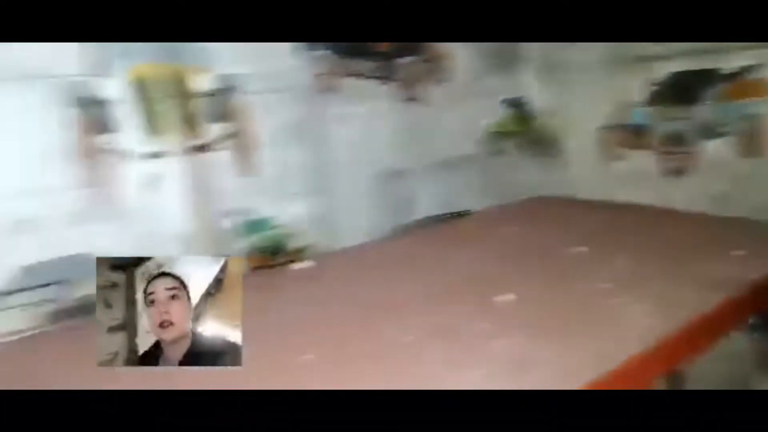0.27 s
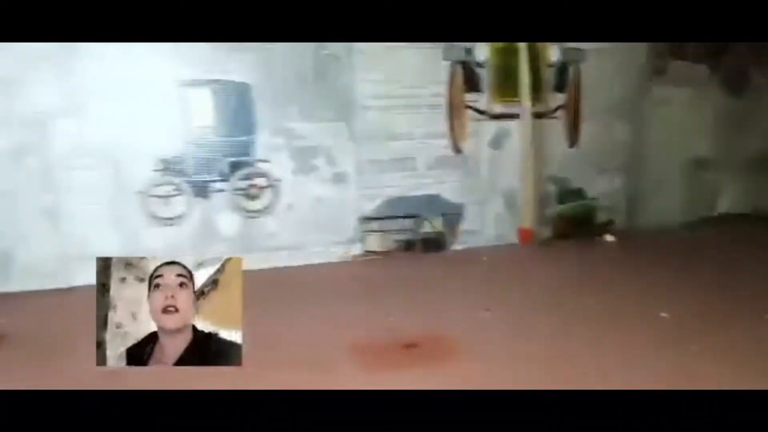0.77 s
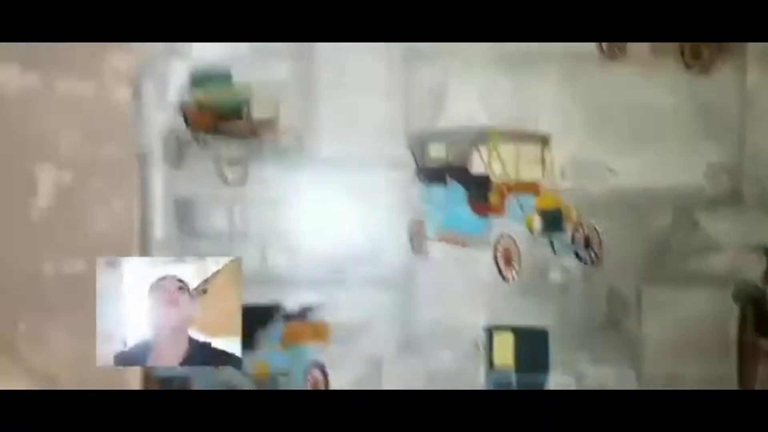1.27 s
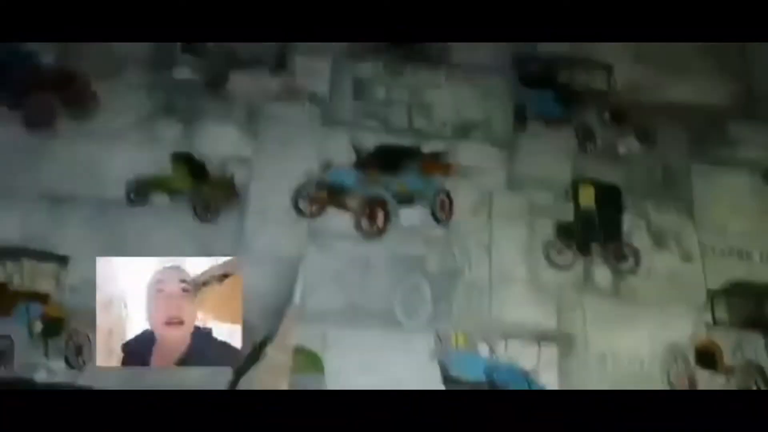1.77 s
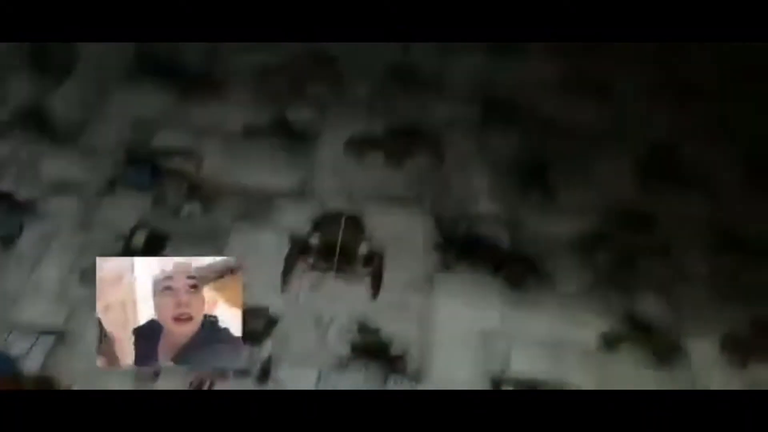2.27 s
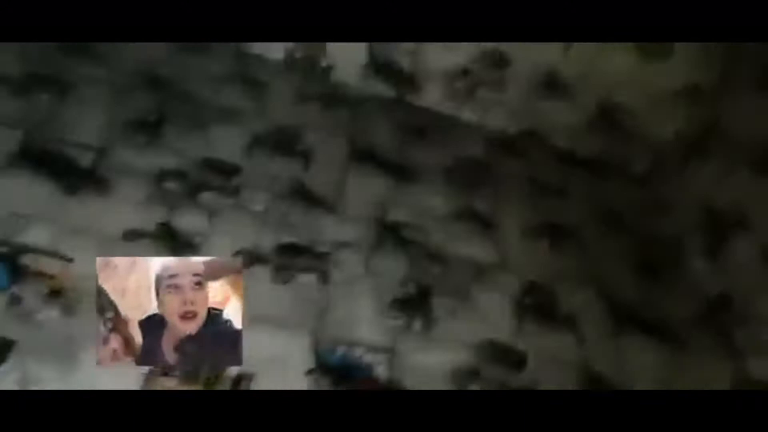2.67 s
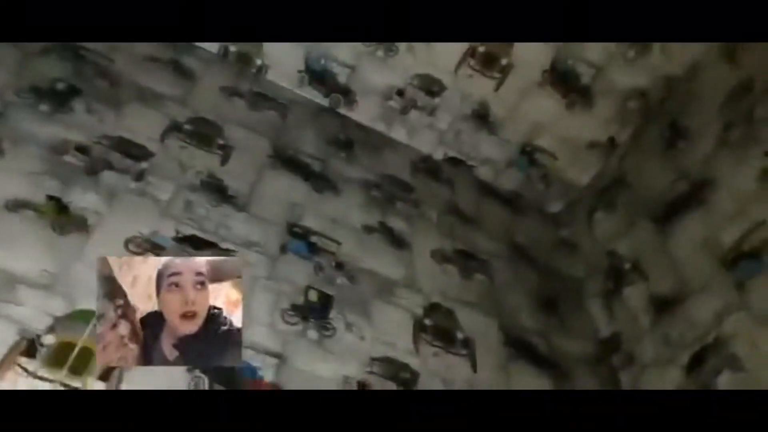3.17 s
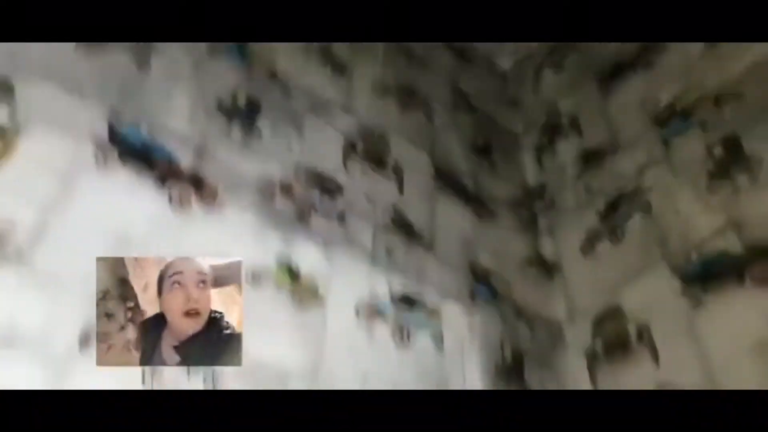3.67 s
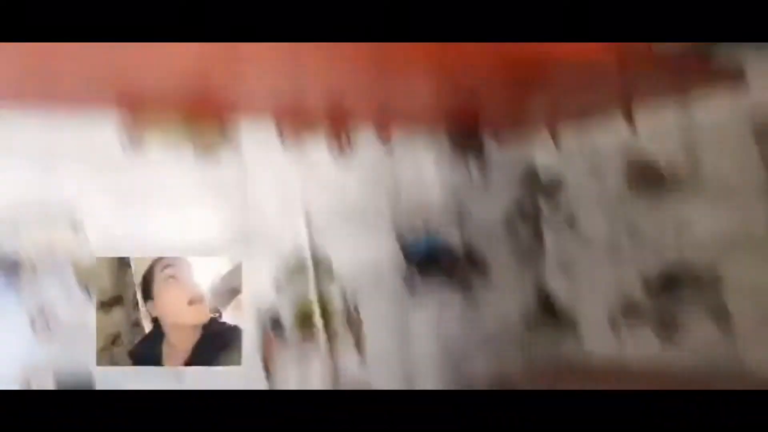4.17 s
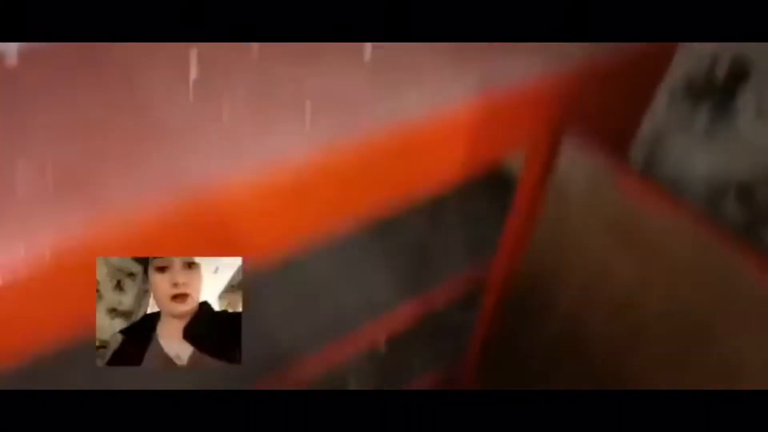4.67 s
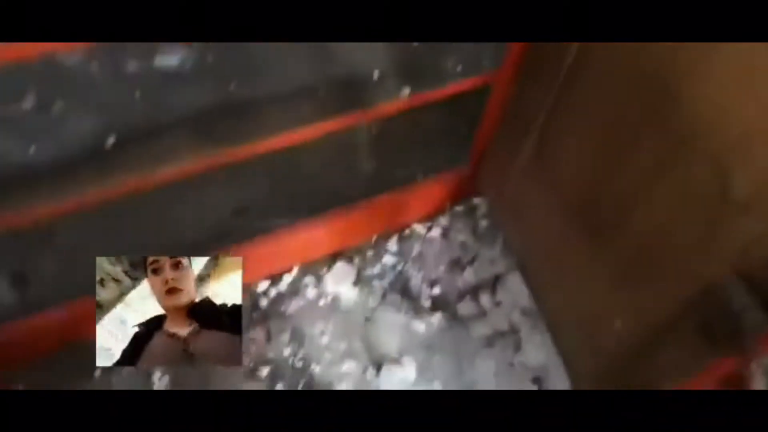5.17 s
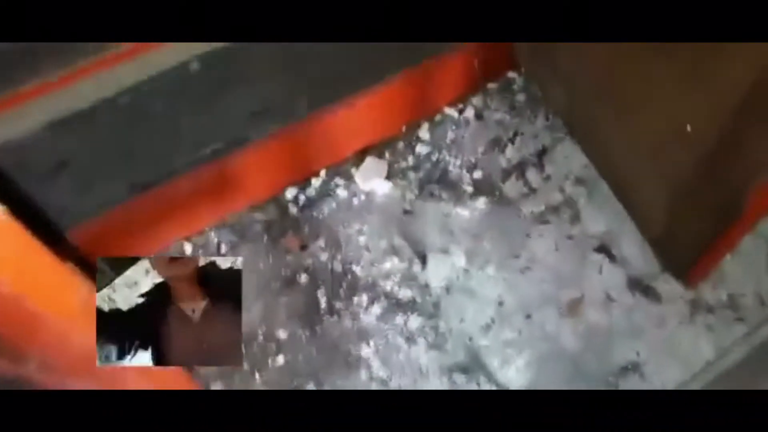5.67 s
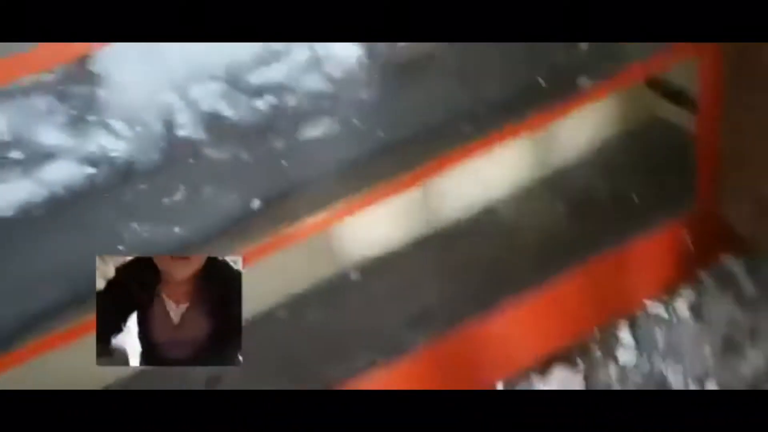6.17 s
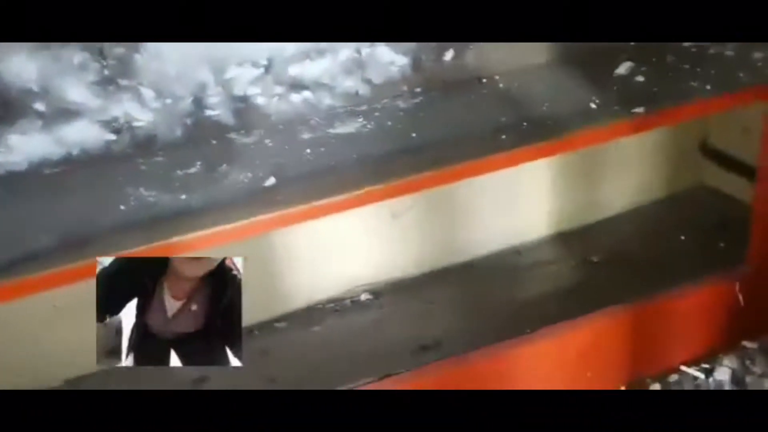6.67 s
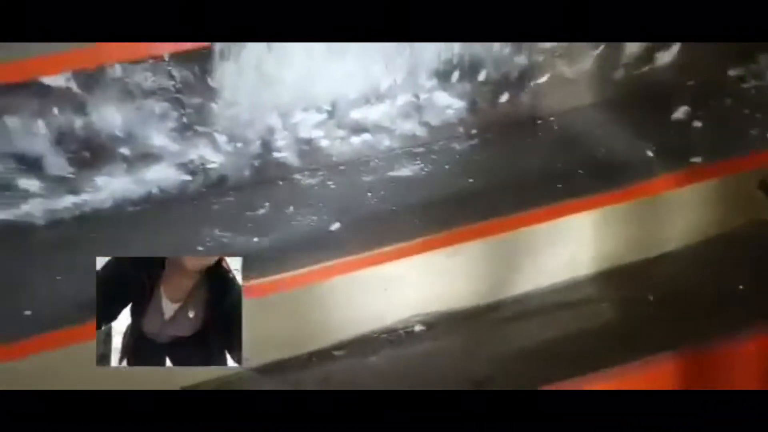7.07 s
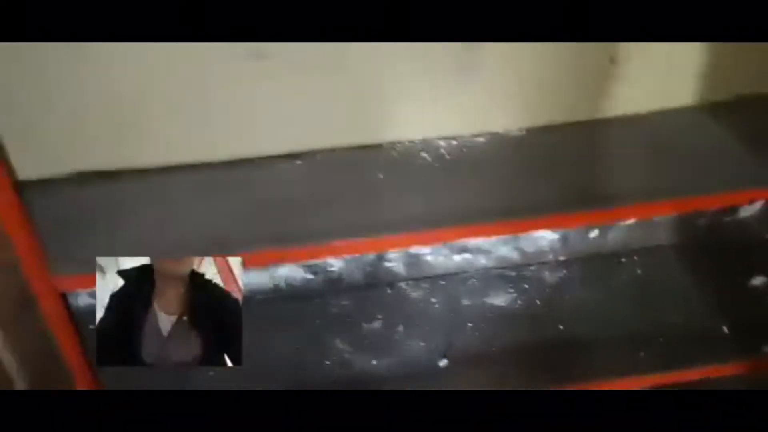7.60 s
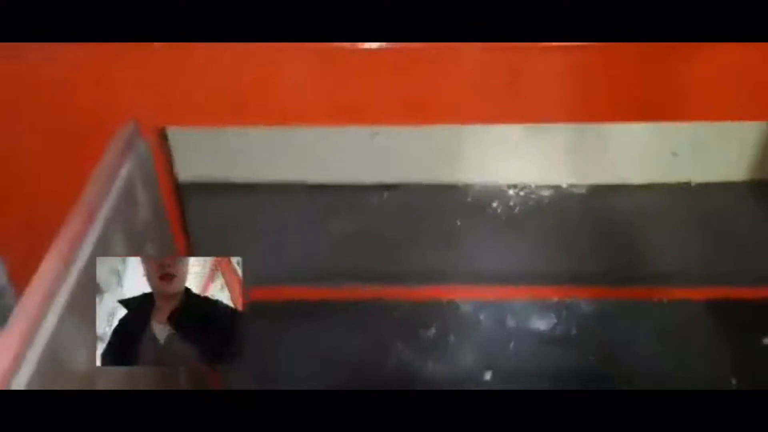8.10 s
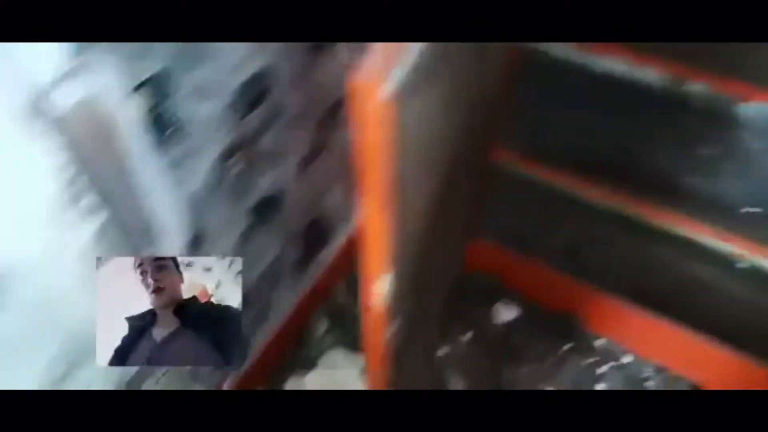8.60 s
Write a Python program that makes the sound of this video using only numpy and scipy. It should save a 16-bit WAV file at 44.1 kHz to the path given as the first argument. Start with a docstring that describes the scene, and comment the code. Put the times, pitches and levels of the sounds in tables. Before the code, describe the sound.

In a bare, empty room, someone steps slowly over grit and broken glass, heard from a moving microphone. A few crunches and soft shuffles come first. Jacket cloth then swishes more strongly as debris crackles and hollow stair boards thud. Near the end, glass cracks sharply twice under a heel, followed by small clinks. Hard walls add a short echo.

```python
"""A bare, empty room: slow steps over grit and broken glass, heard from a moving microphone.
Soles shuffle and crush grit in clusters of tiny impacts; chips snap, loose shards ring, and
panes crack under a heel. Body weight swings the boards of floor and hollow stair with a thud.
Between the steps, jacket cloth rubs on itself and soft noise swells with a gritty scuffing.
The hard walls answer everything."""
import sys
import numpy as np
from scipy import signal
from scipy.fft import rfft, irfft, next_fast_len
from scipy.io import wavfile
from scipy.ndimage import uniform_filter1d, map_coordinates

SR = 44100
rng = np.random.default_rng(int(sys.argv[2]) if len(sys.argv) > 2 else 0)


def generate_wav(signal):
    """Clip the signal to [-1, 1] and save it as 16-bit WAV at the path in sys.argv[1]."""
    frames = np.transpose(np.atleast_2d(signal))
    scaled = np.clip(frames, -1, 1) * 32767
    pcm = np.round(scaled).astype(np.int16)
    wavfile.write(sys.argv[1], SR, pcm)


N = 389844
TOP_HZ = 13150

# crushed grit: (frequency [Hz], level [dB])
GRIT_SPECTRUM = [(60, -39), (250, -14.5), (500, -2.5), (800, 5), (1300, 3.5), (2500, 7.5), (4000, 4),
                 (5200, -4), (7200, -4.5), (13000, -19.5)]
# breaking glass: (frequency [Hz], level [dB])
GLASS_SPECTRUM = [(100, -46), (300, -8.5), (900, -4.5), (2000, 1), (3000, 2.5), (4200, 0.5), (5300, -7),
                  (6500, -0.5), (7800, -2), (10000, -10), (13000, -8)]


def amp(db):
    return 10 ** (np.asarray(db) / 20)


def unit(x):
    return x / np.sqrt(np.mean(x ** 2) + 1e-20)


def along(points, hz):
    """Interpolate (Hz, value) points on a log axis."""
    f, v = np.transpose(points)
    return np.interp(np.log(hz + 1), np.log(f + 1), v)


def add(track, start_s, sound):
    part = track[..., round(start_s * SR):][..., :sound.shape[-1]]
    part += sound[..., :part.shape[-1]]


def wobble(rate_hz):
    """Smooth random curve."""
    knots = rng.standard_normal(int(N * rate_hz / SR) + 4)
    return map_coordinates(knots, [np.arange(N) * rate_hz / SR])


def filtered(x, response):
    """Apply a complex frequency response."""
    n = x.shape[-1]
    m = next_fast_len(n + SR // 4)
    return irfft(rfft(x, m) * response(np.fft.rfftfreq(m, 1 / SR)), m)[..., :n]


def coloured(x, spectrum, tilt_db_oct=0, peak_hz=1000, peak_db=0, size=2048):
    """Minimum-phase filter of unit energy: spectrum, tilt and one resonance."""
    hz = np.fft.rfftfreq(size, 1 / SR)
    resonance_db = peak_db * np.exp(-(np.log2((hz + 1) / peak_hz) / 0.39) ** 2)
    gain_db = along(spectrum, hz) + tilt_db_oct * np.log2(1 + hz / 500) + resonance_db
    cepstrum = irfft(np.log(amp(gain_db)))
    cepstrum[1:size // 2] *= 2
    cepstrum[size // 2 + 1:] = 0
    kernel = irfft(np.exp(rfft(cepstrum)))
    return signal.fftconvolve(x, kernel / np.linalg.norm(kernel))[:len(x)]


def grains(n, rate_hz, spread_db, smooth):
    """Tiny random impacts over a share of smooth noise; rms 1."""
    hits = (rng.random(n) < rate_hz / SR) * rng.choice([-1, 1], n)
    strength = amp(spread_db * np.clip(rng.standard_normal(n), -2, 2))
    return unit(unit(hits * strength) + smooth * rng.standard_normal(n))


def modes(hz, t):
    """Mean of sines with random polarity; hz is a column."""
    return (rng.choice([-1, 1], hz.shape) * np.sin(2 * np.pi * hz * t)).mean(axis=0)


def press(hold_s, attack_s, release_s):
    """1 s envelope of a load that builds, holds and lets go."""
    t = np.arange(SR) / SR
    return (1 - np.exp(-t / attack_s)) * np.exp(-np.maximum(t - hold_s, 0) / release_s)


def swells_db(rows, drop_db=16, shape=1.39):
    """Level of swells whose powers add; shape 1 is pointed, 2 rounded."""
    t, power = np.arange(N) / SR, 1e-12
    for peak_s, db, rise_s, fall_s in rows:
        away = np.maximum((peak_s - t) / rise_s, (t - peak_s) / fall_s)
        power = power + amp(db - drop_db * np.minimum(away, 10) ** shape) ** 2
    return 10 * np.log10(power)


def patchy(x, depth_db):
    """Colour drifts at random."""
    bands = signal.stft(x, nperseg=512)[2]
    field = uniform_filter1d(rng.standard_normal(bands.shape), size=9, axis=0)
    field = uniform_filter1d(field, size=10, axis=1)
    return signal.istft(bands * amp(depth_db * unit(field)), nperseg=512)[1][:N]


def in_room(x, wet_db, pan_db, lag_s=0.00017):
    """Direct sound, lagging at the left, plus diffuse wall reflections; pan_db is left over right."""
    # room decay: (frequency [Hz], T60 [s])
    wall_t60 = [(100, 0.51), (500, 0.42), (2000, 0.29), (7000, 0.31), (13000, 0.12)]
    hz, t, bands = signal.stft(rng.standard_normal((2, SR * 3 // 5)), SR, nperseg=256)
    early = 1 + 2.33 * np.exp(-t / 0.0059)  # floor and stair reflect first
    decay = amp(-60 * t / along(wall_t60, hz)[:, None])
    tail = signal.istft(bands * early * decay, SR, nperseg=256)[1]
    wet = signal.fftconvolve(x[None], tail / np.linalg.norm(tail[0]), axes=1)[:, :len(x)]
    direct = filtered(x, lambda f: np.exp(-2j * np.pi * f * np.array([[lag_s], [0]])))
    return (direct + amp(wet_db) * wet) * amp(np.array([[.5], [-.5]]) * pan_db)


def roaming(x, wet_db, pan_db, size=16384):
    """The microphone moves: reflections and direction change from block to block."""
    hop = size // 2
    out, padded = np.zeros((2, N + size)), np.pad(x, size)
    for start in range(0, N + hop, hop):
        block = np.pad(padded[start + hop:][:size] * np.hanning(size), (0, size))
        heard = in_room(block, wet_db, pan_db + rng.normal(0, 1), lag_s=rng.normal(0.00016, 0.0001))
        add(out, start / SR, heard)
    return out[:, hop:][:, :N]


def shard_ring(x, t60_s=0.11):
    """x rings the modes of a shard, each at a random strength."""
    # glass modes: (frequency [Hz], level [dB])
    shard_modes = [(5910, -5.5), (6700, -15), (7000, -2), (7360, 10), (7620, 6), (8480, 11), (10350, 3),
                   (10580, -1)]
    t = np.arange(SR // 3) / SR
    scatter_db = rng.normal(0, 3, len(shard_modes))
    ring = sum(amp(db + extra_db - 60 * t / t60_s) * np.sin(2 * np.pi * hz * t)
               for (hz, db), extra_db in zip(shard_modes, scatter_db))
    return signal.fftconvolve(x, ring / np.linalg.norm(ring))[:len(x)]


def room_air():
    """Steady low noise, independent per channel."""
    # room tone: (frequency [Hz], level [dB])
    air_spectrum = [(20, 13.5), (150, -8), (400, -10), (1500, -6), (5000, -33), (13000, -28)]
    return np.array([coloured(rng.standard_normal(N), air_spectrum) for channel in range(2)])


def weight_rumble():
    """Shifting body weight rocks and rumbles."""
    # load on the floor: (time [s], relative level [dB])
    weight_levels = [(0.0, -58), (0.83, -65), (1.08, -54.5), (2.1, -62), (3.1, -63), (4.9, -61.5),
                     (5.17, -54), (6.2, -55), (7.31, -64.5), (8.08, -53.5), (8.84, -64.5)]
    # floor rumble: (frequency [Hz], level [dB])
    rumble_spectrum = [(20, -14), (52, 8), (72, 2.5), (95, 1.5), (270, -2), (400, -15.5), (900, -28.5)]
    weight_db = np.interp(np.arange(N) / SR, *np.transpose(weight_levels))
    rock_db = 3 * wobble(12)
    rumble = amp(weight_db + rock_db) * coloured(rng.standard_normal(N), rumble_spectrum)
    return amp(-2) * in_room(rumble, wet_db=-1, pan_db=6.5)


def crunches():
    """A sole snaps one crumb, then crushes grit against a resonant piece of debris."""
    # presses: (time [s], level [dB], hold [s], tilt [dB/octave], resonance [Hz])
    presses = [(0.028, -47, 0.028, -4, 1550), (1.133, -38.5, 0.033, -9, 1460),
               (1.25, -39.5, 0.0092, -11, 1450), (1.289, -38, 0.012, 2, 7140),
               (1.377, -38, 0.025, -2, 1310), (2.087, -51, 0.0091, 6, 6964), (2.789, -41.5, 0.02, 2.5, 890),
               (2.836, -41, 0.024, 3, 800), (3.659, -39, 0.016, 2, 6340), (3.681, -34, 0.022, -0.5, 2280),
               (4.841, -41.5, 0.017, 8.5, 1540), (4.925, -35, 0.0049, -4, 2390),
               (4.967, -34, 0.016, 2.5, 6940), (4.99, -33, 0.015, -0.5, 2300), (5.043, -35, .009, 5, 2600),
               (5.087, -36.5, 0.0035, -3, 885), (5.536, -39, 0.0045, 4, 2500),
               (6.076, -39.5, 0.017, 2, 2920), (6.317, -44.5, 0.021, 1, 2200),
               (6.79, -39, 0.0092, -5.5, 2570), (7.737, -42.5, 0.098, 0, 2350),
               (7.845, -39.5, 0.082, -0.5, 6800), (7.917, -33, 0.058, 1, 606)]
    out = np.zeros((2, N))
    for start_s, db, hold_s, tilt_db_oct, hz in presses:
        load = press(hold_s, attack_s=0.0022, release_s=0.016)
        crush = load * grains(SR, rate_hz=2000, spread_db=6.5, smooth=0.26)
        crush[0] += 5  # first crumb
        crunch = coloured(crush, GRIT_SPECTRUM, tilt_db_oct, hz, peak_db=6.5)
        add(out, start_s, amp(db) * in_room(crunch, wet_db=0.5, pan_db=-3.5))
    return out


def jacket_and_crumbs(catch_db, slip_db):
    """With each swing of a limb, cloth slides on itself and glass crumbs snap underfoot."""
    # limb swings: (fastest moment [s], relative level [dB], rise [s], fall [s])
    swings = [(0.15, -66.5, 1, 1.3), (1.06, -44, 0.16, 1.5), (3.55, -57, 0.17, 0.28),
              (3.78, -48.5, 0.19, 0.25), (4.1, -48, 0.14, 0.68), (4.53, -40.5, 0.17, 0.23),
              (4.93, -48, 0.65, 0.37), (5.33, -40, 0.12, 0.16), (5.58, -34.5, 0.41, 0.42),
              (5.88, -35.5, 0.3, 0.49), (6.28, -44, 0.13, 0.16), (6.65, -56.5, 0.94, 1.35),
              (7.88, -41.5, 0.48, 0.46), (8.55, -51.5, 1, 0.71)]
    # rubbing cloth: (frequency [Hz], level [dB])
    cloth_spectrum = [(400, -41), (1400, -13), (2400, -2.5), (4200, -10.5), (5200, -10.5), (6900, -2.5),
                      (7900, -4), (10500, -10.5), (13000, -7)]
    swing_db = swells_db(swings)
    rub = amp(swing_db + 0.5 * catch_db + slip_db) * grains(N, rate_hz=900, spread_db=1.5, smooth=1)
    crumbs = amp(swing_db - 7 + catch_db) * grains(N, rate_hz=130, spread_db=3.5, smooth=0)
    swish = coloured(rub, cloth_spectrum) + amp(-15.5) * shard_ring(crumbs)
    crackle = in_room(coloured(crumbs, GRIT_SPECTRUM, tilt_db_oct=7), wet_db=3.5, pan_db=-5.5)
    return crackle + amp(-1.5) * roaming(patchy(swish, depth_db=2.5), wet_db=4, pan_db=-4)


def shuffles(catch_db):
    """A shoe rubs softly on the boards."""
    # shoe strokes: (fastest moment [s], level [dB], rise [s], fall [s])
    shoe_strokes = [(0.27, -56, 0.12, 0.17), (0.96, -53, 0.13, 0.11), (1.65, -57, 0.72, 0.2),
                    (2.48, -63, 0.056, 0.1), (2.875, -52, 0.049, 0.1)]
    # shoe on wood: (frequency [Hz], level [dB])
    shoe_spectrum = [(50, -24), (110, 10), (240, 3), (450, 3.5), (700, -4.5), (1500, -38), (5000, -37)]
    rub = coloured(grains(N, rate_hz=200, spread_db=-0.5, smooth=0.8), shoe_spectrum)
    return in_room(amp(swells_db(shoe_strokes) + catch_db) * rub, wet_db=-5, pan_db=3.5)


def swells_and_scuffs(flutter_db):
    """Soft, broad mid-range swells of rushing noise and gritty scuffing."""
    # noise swells and scuffs: (peak time [s], relative level [dB], rise [s], fall [s])
    swells = [(0.28, -62, 0.25, 0.6), (1.19, -52, 0.38, 1), (1.6, -51.5, 0.5, 0.48),
              (2.6, -65.5, 0.23, 0.39), (3.19, -69.5, 0.026, 0.11), (3.88, -53.5, 0.32, 0.25),
              (4.42, -57.5, 0.58, 0.3), (4.97, -52, 0.25, 0.27), (5.4, -48.5, 0.25, 0.28),
              (7.5, -63, 1, 0.64), (7.98, -53, 0.36, 0.32), (8.65, -60.5, 0.63, 0.29)]
    # mid-range rush: (frequency [Hz], level [dB])
    rush_spectrum = [(100, -12), (300, -7), (700, -1), (1100, 2), (1700, 4), (3500, -10.5), (6000, -15),
                     (13000, -55)]
    rush = coloured(grains(N, rate_hz=500, spread_db=0.5, smooth=0.68), rush_spectrum)
    rush *= amp(swells_db(swells) + flutter_db)
    return amp(4.5) * roaming(patchy(rush, depth_db=2), wet_db=-1.5, pan_db=-2)


def thuds(hollow_hz=128.4):
    """Body weight knocks and swings a board; the hollow beneath booms."""
    # loads on floor and stair: (time [s], level [dB], hold [s], board pitch [Hz])
    footfalls = [(0.875, -49.5, 0.062, 99), (1.159, -45, 0.093, 93), (2.091, -45, 0.0046, 130),
                 (2.104, -46.5, 0.0055, 280), (3.72, -51, 0.097, 159.8), (4.954, -44, 0.033, 258),
                 (5.054, -40, 0.055, 223), (5.08, -38.5, 0.029, 102), (5.755, -44, 0.031, 191),
                 (6.075, -39.5, 0.059, 175.7), (6.12, -47.5, 0.065, 129.2), (6.329, -47, 0.055, 173.3),
                 (6.811, -40.5, 0.034, 177), (7.369, -47.5, 0.068, 183), (7.92, -40.5, 0.05, 184),
                 (8.122, -44, 0.089, 191.3), (8.409, -47.5, 0.0046, 197)]
    # dull knock: (frequency [Hz], level [dB])
    knock_spectrum = [(40, -36), (110, 0), (280, 0), (700, -7.5), (2000, -62)]
    out, t = np.zeros((2, N)), np.arange(SR) / SR
    for start_s, db, hold_s, hz in footfalls:
        sway_rad = 0.041 * np.cumsum(rng.standard_normal(SR))  # the load detunes the board
        board = np.sin(2 * np.pi * hz * t + sway_rad)
        board *= press(hold_s, attack_s=0.0007, release_s=0.76 * hold_s)
        blow = rng.standard_normal(SR) * press(hold_s, attack_s=0.00088, release_s=0.68 * hold_s)
        hardness_db = -3 * np.log2(hold_s / 0.031)  # quick contacts knock harder
        knock = amp(hardness_db - 7.5) * coloured(blow, knock_spectrum)
        boom = np.sin(2 * np.pi * hollow_hz * t + sway_rad / 2)
        boom *= press(hold_s, attack_s=0.026, release_s=0.08)
        boom *= amp(-9.5) * hold_s / 0.055  # a long load moves more air
        add(out, start_s, amp(db) * in_room(board + knock + boom, wet_db=-7.5, pan_db=3))
    return out


def chips(ring_s=0.0022, log_spread=0.307):
    """A glass chip breaks with a click and rings briefly in eight scattered modes."""
    # breaks: (time [s], ring peak [dB], centre pitch [Hz])
    chip_breaks = [(1.138, -27, 1330), (1.251, -26, 1550), (1.293, -25.5, 4540), (1.384, -24.5, 1400),
                   (1.542, -25.5, 1610), (2.786, -25.5, 5130), (4.928, -22, 2770), (4.935, -26, 3770),
                   (4.964, -20.5, 5370), (4.99, -18, 2480), (5.051, -25, 2840), (5.0887, -21, 1910),
                   (5.542, -21, 2860), (7.1596, -7.5, 7680), (7.1655, -23, 7150), (7.8175, -6, 7200),
                   (7.828, -8.5, 7340), (8.098, -25, 2760), (8.122, -33, 4480), (8.147, -32, 4200)]
    out, t = np.zeros((2, N)), np.arange(SR // 2) / SR
    for start_s, db, hz in chip_breaks:
        modes_hz = np.minimum(hz * np.exp(log_spread * rng.standard_normal((8, 1))), TOP_HZ)
        ring = modes(modes_hz, t) * np.exp(-t / ring_s)
        click = coloured(rng.standard_normal(len(t)) * np.exp(-t / 0.00035), GLASS_SPECTRUM)
        snap = ring / np.abs(ring).max() + amp(-4) * click / np.abs(click).max()
        add(out, start_s, amp(db) * in_room(snap, wet_db=-3, pan_db=-3))
    return out


def clinks():
    """Loose pieces land with a tick and a ping; the shards around them ring."""
    # landings: (time [s], relative level [dB])
    landings = [(5.093, -32), (8.0984, -27), (8.111, -37), (8.123, -52), (8.1537, -30)]
    # bright tick: (frequency [Hz], level [dB])
    tick_spectrum = [(1000, -30), (4900, -30), (5900, 6), (7500, 11), (13000, -2.5)]
    ticks, t = np.zeros(N), np.arange(SR) / SR
    for start_s, db in landings:
        ping = modes(rng.uniform(5500, 12500, (16, 1)), t) * np.exp(-t / 0.0034)
        contact = rng.standard_normal(SR) * press(0.0048, attack_s=0.00063, release_s=0.00096)
        add(ticks, start_s, amp(db) * (contact + amp(15.5) * ping))
    glass = coloured(ticks, tick_spectrum) + amp(-9) * shard_ring(ticks)
    return in_room(glass, wet_db=-1.5, pan_db=-3)


def cracks(tread_ring_s=0.034):
    """A fracture runs through a pane as a volley of snaps; splinters follow and the tread knocks."""
    # panes: (time [s], relative level [dB], hold [s], tilt [dB/octave], pan [dB], tread pitch [Hz])
    fractures = [(7.155, -16.5, 0.01, 2.5, 1.5, 626), (7.174, -25, 0.021, 2, -8, 672),
                 (7.812, -12.5, 0.017, 2.2, -1.5, 352.7)]
    out, t = np.zeros((2, N)), np.arange(SR) / SR
    for start_s, db, hold_s, tilt_db_oct, pan_db, hz in fractures:
        snaps = grains(SR, rate_hz=2800, spread_db=2.5, smooth=0.042)
        snaps *= press(hold_s, attack_s=0.0013, release_s=0.0013)
        splinters = amp(-7) * grains(SR, rate_hz=170, spread_db=-2, smooth=0)
        splinters *= press(hold_s, attack_s=0.031, release_s=0.067)
        tread = amp(-21) * np.sin(2 * np.pi * hz * t) * np.exp(-t / tread_ring_s)
        pane = coloured(snaps + splinters, GLASS_SPECTRUM, tilt_db_oct) + amp(-13) * shard_ring(snaps)
        add(out, start_s, amp(db - 4) * in_room(pane + tread, wet_db=4.5, pan_db=pan_db))
    return out


def scene():
    air = amp(-68) * room_air()
    impacts = crunches() + chips() + cracks() + clinks() + thuds()
    rumble = weight_rumble()
    catch_db, slip_db = wobble(35), 1.6 * wobble(160)  # rubbing surfaces catch and slip
    rubbing = jacket_and_crumbs(catch_db, slip_db) + shuffles(catch_db)
    return air + impacts + rumble + rubbing + swells_and_scuffs(catch_db + slip_db)


def record(dry):
    """Microphone ports notch the treble; soft peak limit, then a steep low-pass."""
    # microphone response: (frequency [Hz], gain [dB])
    port_response = [(20, 1), (8000, 0.5), (8500, -8), (9050, -21.5), (9450, -7), (9800, 5.5),
                     (13000, -1.5)]
    x = filtered(dry, lambda hz: amp(along(port_response, hz)))
    rounded = x / (1 + (x / 0.75) ** 4) ** (1 / 4)
    return filtered(rounded, lambda hz: 1 / (1 + (hz / TOP_HZ) ** 160))


dry = scene()
out = record(dry)
generate_wav(out)
```